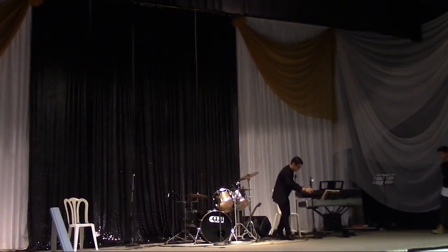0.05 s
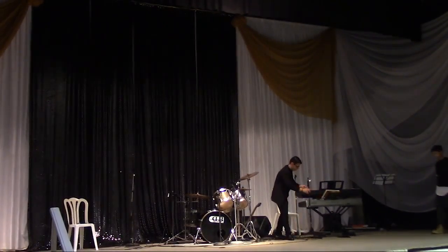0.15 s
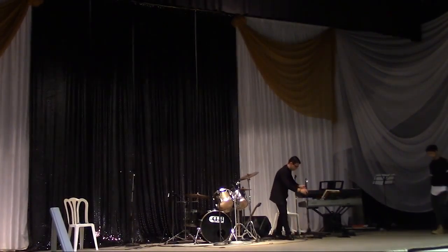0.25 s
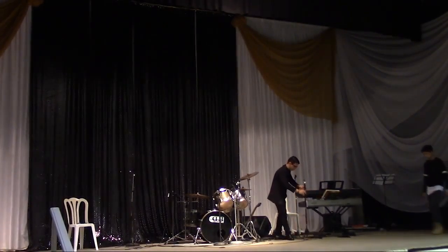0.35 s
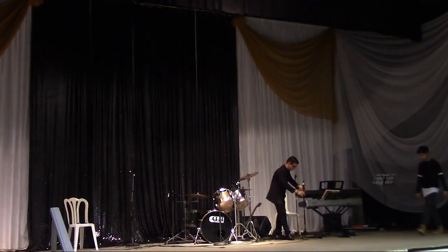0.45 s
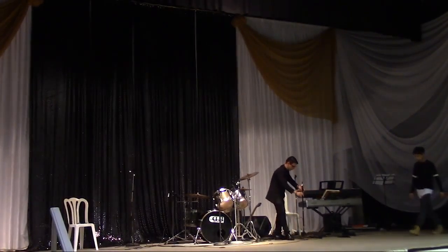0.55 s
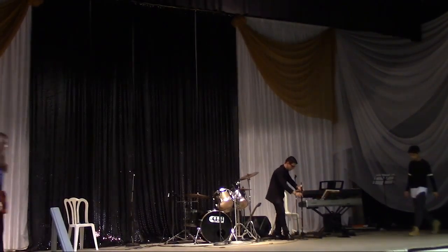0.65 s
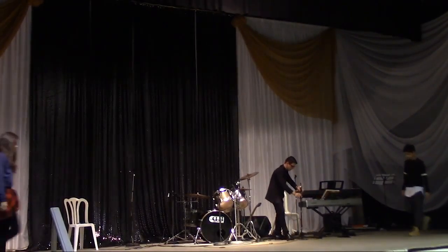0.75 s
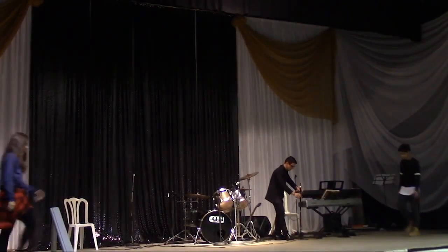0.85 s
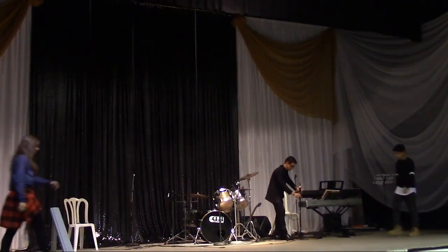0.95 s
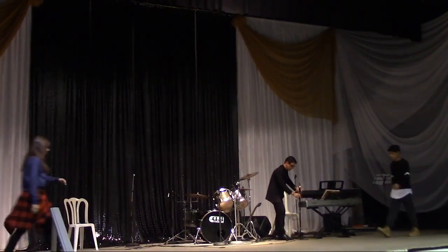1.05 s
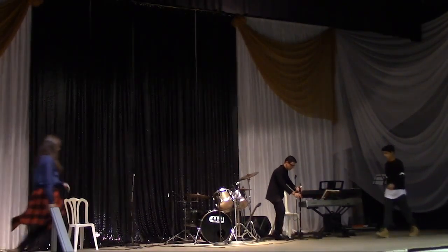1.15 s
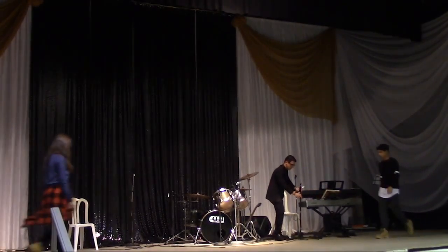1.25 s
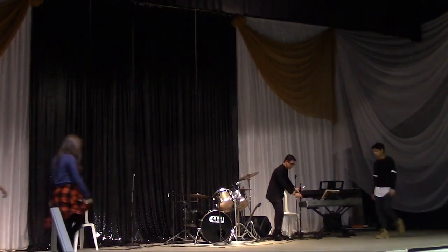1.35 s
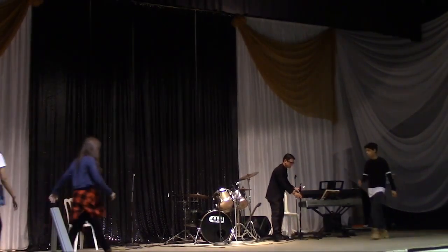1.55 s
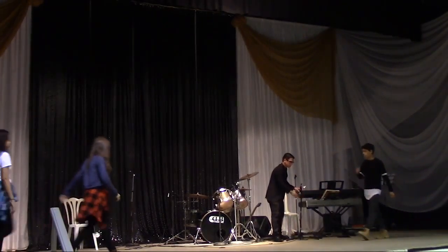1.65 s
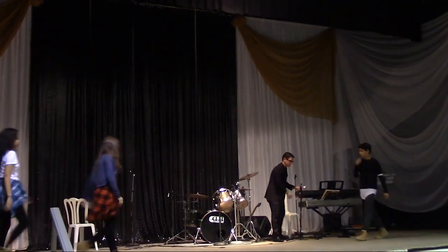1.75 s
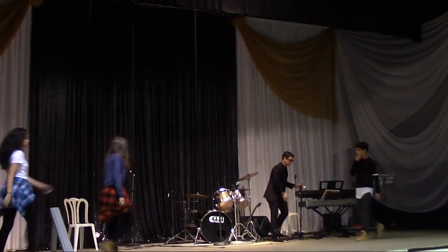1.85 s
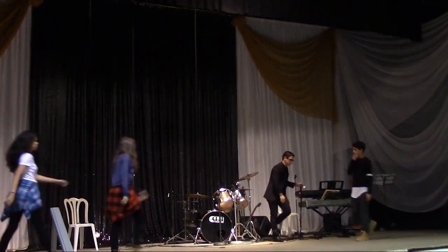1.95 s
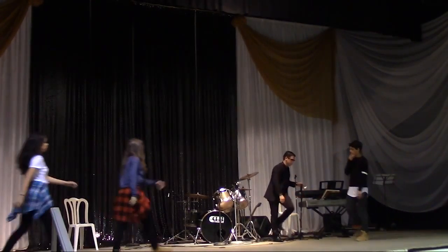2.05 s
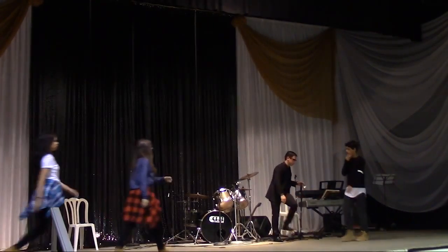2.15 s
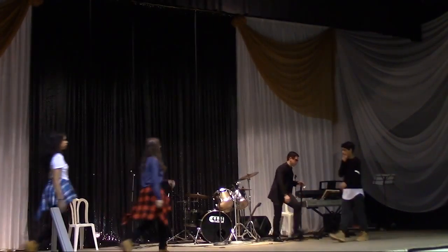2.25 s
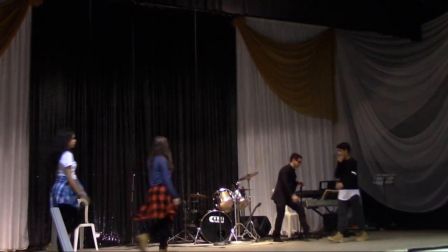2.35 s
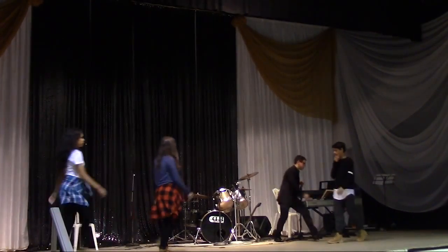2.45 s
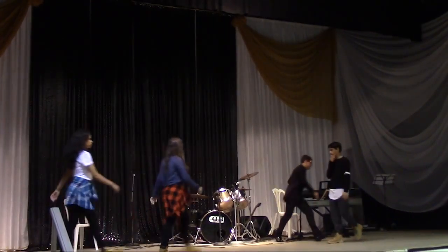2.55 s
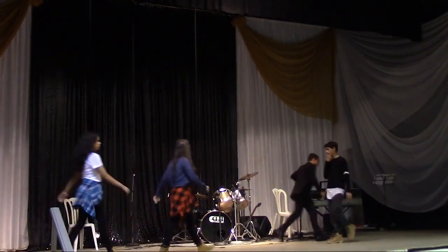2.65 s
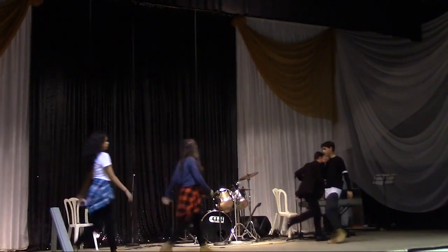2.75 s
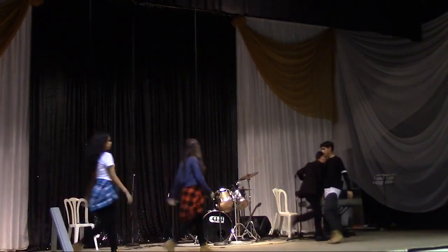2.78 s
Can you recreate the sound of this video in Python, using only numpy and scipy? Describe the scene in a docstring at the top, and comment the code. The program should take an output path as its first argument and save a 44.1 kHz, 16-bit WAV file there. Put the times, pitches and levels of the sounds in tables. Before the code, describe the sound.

A live microphone is bumped and rubbed for a third of a second, clicks off with a pop, then only quiet electrical hum and hiss continue.

```python
"""At a live microphone there are knocks and rubs: damped body modes thump and band-passed noise rustles
over low rumble, a broad roar of air and a small motor's whine, a comb of close high lines.
Its switch opens with a pop, a decaying spike with a low swing after it. Mains hum, a sum of sines, the
hiss of the open input stage and short treble noise patches, opposite on the two sides, run throughout
and then go on alone."""
import sys
import numpy as np
from scipy import signal
from scipy.fft import rfft, irfft
from scipy.io import wavfile
from scipy.ndimage import uniform_filter1d

SR = 44100
rng = np.random.default_rng(int(sys.argv[2]) if len(sys.argv) > 2 else 0)


def decibels_to_gain(level_db):
    """Convert a level in decibels to a linear amplitude gain (20 dB per decade)."""
    exponent = np.asarray(level_db, float) / 20
    return 10 ** exponent


def transcribe(u):
    """Save the signal u as a 16-bit wav file named by the first command-line argument.

    u: samples, shape (n,) or (channels, n), limited to [-1, 1]; the rate is SR.
    q: integer samples, one column per channel.
    """
    v = np.clip(np.atleast_2d(u).T, -1, 1)
    q = np.round(v * 32767).astype(np.int16)
    wavfile.write(sys.argv[1], SR, q)


N = 306054   # samples in the scene
SWITCH_S = 0.36958   # the microphone's switch opens


def rms_one(x):
    """Normalisation: scale to rms 1."""
    return x / np.sqrt(np.mean(x ** 2) + 1e-20)


def coloured(spectrum, size):
    """Spectral shaping: white noise weighted by a density curve over log frequency, at rms 1."""
    hz, level_db = np.transpose(spectrum)
    bins_hz = np.maximum(np.fft.rfftfreq(size, 1 / SR), 1)
    shape = decibels_to_gain(np.interp(np.log(bins_hz), np.log(hz), level_db))
    white = rng.standard_normal(size)
    return rms_one(irfft(rfft(white) * shape, size))


def resonance(x, hz, width_hz):
    """Forced resonance: a two-pole band-pass with gain 1 on top."""
    r = np.exp(-np.pi * width_hz / SR)
    zeros = np.array([1, 0, -1]) * (1 - r * r) / 2
    poles = [1, -2 * r * np.cos(2 * np.pi * hz / SR), r * r]
    return signal.lfilter(zeros, poles, x)


def ring(clicks, hz, t60):
    """Free damped vibration: a unit click starts a sine of height 1 that falls 60 dB in t60 seconds."""
    r = decibels_to_gain(-60 / (t60 * SR))
    w = 2 * np.pi * hz / SR
    return signal.lfilter([0, np.sin(w)], [1, -2 * r * np.cos(w), r * r], clicks + 1e-18)


def glide_db(curve, t):
    """Level envelope: straight lines in dB between time points, returned as amplitude."""
    return decibels_to_gain(np.interp(t, *np.transpose(curve)))


# spectrum of the handling rumble: pitch_hz, density_db (dB per Hz, relative)
RUMBLE_SPECTRUM = [(25, -30), (50, -7), (75, -8), (160, 2), (260, -4), (400, -20), (800, -58)]
# how hard the microphone is handled, as rumble level before the low cut: time_s, level_db
HANDLING_LEVEL = [(0.0, -18.5), (0.056, -17), (0.124, -18), (0.196, -22.5), (0.3, -27.5), (0.365, -26.5)]


def rumble(t):
    """Structure-borne noise: low-frequency noise follows how hard the body is handled."""
    return glide_db(HANDLING_LEVEL, t) * coloured(RUMBLE_SPECTRUM, len(t))


# spectrum of the air noise: pitch_hz, density_db (dB per Hz, relative)
ROAR_SPECTRUM = [(150, -32), (250, -4), (450, -7), (900, -6.5), (1300, -11), (2200, -14.5), (3800, -16.5),
                 (4700, -21.5), (5600, -27.5), (7000, -25.5), (9000, -36), (15500, -46)]
# narrow resonances in the roar: pitch_hz, width_hz (of each of two passes), level_db (middle, against the roar)
ROAR_RESONANCES = [(447, 30, -14.5), (710, 42, -23.5), (1435, 20, -16.5), (1705, 330, -10.5),
                   (1852, 38, -22), (5186, 330, -17)]


def roar(size):
    """Noise-driven resonance: broad air noise with narrow peaks that swell and fade on their own."""
    white = rng.standard_normal(size)
    out = coloured(ROAR_SPECTRUM, size)
    for hz, width_hz, level_db in ROAR_RESONANCES:
        swell_db = np.interp(np.linspace(0, 11, size), np.arange(12), rng.normal(0, 2.3, 12))
        once = resonance(white, hz, width_hz)
        peak = rms_one(resonance(once, hz, width_hz))
        out = out + decibels_to_gain(level_db + swell_db) * peak
    return out


# rubs on the microphone grille: start_s, end_s, level_db (before the limiter)
GRILLE_RUBS = [(0.0, 0.13, -38), (.135, 0.15, -44), (.19, .215, -45)]


def rustle(t):
    """Friction noise: bright band-passed noise swells into each rub and fades after it."""
    rise_db_per_s, fade_db_per_s = 300, 400
    level = 0
    for start_s, end_s, level_db in GRILLE_RUBS:
        early_db = rise_db_per_s * np.maximum(start_s - t, 0)
        late_db = fade_db_per_s * np.maximum(t - end_s, 0)
        level = level + decibels_to_gain(level_db - early_db - late_db)
    bright = resonance(rng.standard_normal(len(t)), hz=9000, width_hz=1900)
    return level * rms_one(bright)


# level of the motor's whine before the limiter: time_s, level_db
WHINE_LEVEL = [(0.0, -41), (0.1, -41), (0.17, -52), (0.26, -46), (0.365, -41)]


def whine(t):
    """Periodic excitation: one tick a turn rings a small housing, giving a comb of close high lines."""
    turns_per_s, housing_hz, width_hz = 140.07, 7020, 260
    ticks = np.diff(np.floor(np.arange(len(t) + 1) * turns_per_s / SR))
    once = resonance(ticks, housing_hz, width_hz)
    comb = rms_one(resonance(once, housing_hz, width_hz))
    return glide_db(WHINE_LEVEL, t) * comb


# single low lines of the hum: multiple (of the mains frequency), level_db (rms)
HUM_LINES = [(1, -48.2), (2, -70.8), (3, -68.5), (5, -64.9), (7, -75.3), (9, -69.1), (10, -82.6),
             (11, -69.1)]
# faint series of lines: first_multiple, last_multiple, step, level_db (rms at the first), fall_db (per multiple)
HUM_FAINT_SERIES = [(13, 21, 2, -77.8, .25), (4, 16, 4, -79, .6), (27, 31, 2, -86.5, 0)]


def mains_hum():
    """Fourier synthesis: steady mains multiples, mostly stronger at odd ones and fading upwards."""
    mains_hz = 60.032
    turn = 2 * np.pi * mains_hz * np.arange(N) / SR
    lines = list(HUM_LINES)
    for first, last, step, level_db, fall_db in HUM_FAINT_SERIES:
        for multiple in range(first, last + 1, step):
            lines.append((multiple, level_db - fall_db * (multiple - first)))
    out = 0
    for multiple, level_db in lines:
        phase = rng.uniform(0, 2 * np.pi)
        out = out + np.sqrt(2) * decibels_to_gain(level_db) * np.sin(round(multiple) * turn + phase)
    return out


# spectrum of the input stage's hiss: pitch_hz, density_db (dB per Hz, relative)
HISS_SPECTRUM = [(20, -0.5), (300, -3.5), (1500, -3), (3000, -2.5), (5000, -1.2), (8000, -0.5), (11000, -1),
                 (13500, -1.5), (15600, -3.5)]


def hiss():
    """Electronic noise: the input stage's steady hiss, common to both sides, at -48 dB rms."""
    return decibels_to_gain(-48) * coloured(HISS_SPECTRUM, N)


# borders between neighbouring treble bands: pitch_hz
PATCH_BAND_EDGES = [4100, 5500, 6900, 8300, 9600, 11700, 13800, 15700]


def side_patches():
    """Decorrelation: short patches of noise, band by band in the treble, to be opposite on the two sides."""
    step, share = 1024, 0.045   # samples, chance of a patch per step and band
    noise = decibels_to_gain(-52) * coloured(HISS_SPECTRUM, N)
    window = np.sin(np.pi * np.arange(2 * step) / (2 * step))
    out = 0
    for low_hz, high_hz in zip(PATCH_BAND_EDGES, PATCH_BAND_EDGES[1:]):
        starts = np.zeros(N)
        starts[::step] = rng.random(len(starts[::step])) < share
        sos = signal.butter(6, [low_hz, high_hz], "band", fs=SR, output="sos")
        band = signal.sosfilt(sos, noise)
        out = out + band * signal.fftconvolve(starts, window)[:N]
    return out


# knocks on the microphone body: start_s, level_db (before mode levels and limiter),
# tilt_db (per mode towards the higher ones)
BODY_KNOCKS = [(0.03, -16.5, -4.5), (.039, -12.5, -7.5), (0.068, -8, 6), (0.083, -7.5, 4.5),
               (0.105, -1, -2.5), (0.119, -12, 4), (0.13, -22, 4), (.153, -1, 6.5), (0.17, -8.5, -5),
               (.198, -20, 3)]
# modes of the microphone body: pitch_hz, level_db (against the knock), t60_s
BODY_MODES = [(75.2, -2, 0.078), (146, -4.5, 0.079), (247, -12.5, 0.075)]


def knocks(size):
    """Modal excitation: each knock strikes the body modes, deeper or brighter by where it lands."""
    start_s, level_db, tilt_db = np.transpose(BODY_KNOCKS)
    spread_db = rng.normal(0, 1.1, (len(start_s), len(BODY_MODES)))
    out = 0
    for k, (hz, mode_db, t60_s) in enumerate(BODY_MODES):
        clicks = np.zeros(size)
        strike_db = level_db + mode_db + (k - 1.5) * tilt_db + spread_db[:, k]
        clicks[(start_s * SR).astype(int)] = -decibels_to_gain(strike_db)
        out = out + ring(clicks, hz, t60_s)
    return out


def limiter(x):
    """Dynamic compression: peaks pull the gain down, it recovers in tens of ms, and tops are rounded."""
    ceiling_db, release_db_per_s, share, clip_top = -10.5, 225, 0.52, 0.44
    climb_db = release_db_per_s * np.arange(len(x)) / SR
    over_db = np.maximum(20 * np.log10(abs(x) + 1e-9) - ceiling_db, 0)
    # a running maximum on a rising ramp: instant rise, then a straight fall in dB
    held_db = np.maximum.accumulate(over_db + climb_db) - climb_db
    gain = decibels_to_gain(-share * uniform_filter1d(held_db, size=88))   # smoothed over 2 ms
    return clip_top * np.tanh(gain * x / clip_top)


def live_microphone():
    """Superposition: all the microphone hears until its switch opens, through a low cut and the limiter."""
    size = round(SWITCH_S * SR)
    t = np.arange(size) / SR
    heard = rumble(t) + knocks(size) + decibels_to_gain(-22) * roar(size) + rustle(t) + whine(t)
    low_cut = signal.butter(3, 59, "high", fs=SR, output="sos")
    heard = signal.sosfilt(low_cut, heard)
    return np.pad(limiter(heard), (0, N - size))


def switch_pop():
    """Step response: the bias voltage jumps in a sharp spike, then the low-cut filter swings back and settles."""
    since = np.arange(N) / SR - SWITCH_S
    click = (np.arange(N) == round(SWITCH_S * SR)) * 1.
    spike = -decibels_to_gain(-4.5) * np.exp(-np.maximum(since, 0) / 0.0002) * (since >= 0)
    # the contact kicks the other way first
    bounce = decibels_to_gain(-14) * np.exp(-((since + 0.00007) / 0.00004) ** 2)
    swing = decibels_to_gain(-16) * ring(click, hz=95, t60=0.03)
    # the input stage rounds the edge
    rounding = signal.butter(3, 9000, fs=SR, output="sos")
    return signal.sosfilt(rounding, spike + bounce + swing)


def scene():
    """Superposition: one signal feeds both channels; only the treble patches differ, opposite in sign."""
    common = live_microphone() + switch_pop() + mains_hum() + hiss()
    return common + side_patches() * [[1], [-1]]


def roll_off(x):
    """The treble ends steeply here."""
    return signal.sosfilt(signal.butter(12, 15750, fs=SR, output="sos"), x)


def record(dry):
    """Direct pick-up: the mix passes on with no room or filter added."""
    return roll_off(dry)


dry = scene()
out = record(dry)
transcribe(out)
```